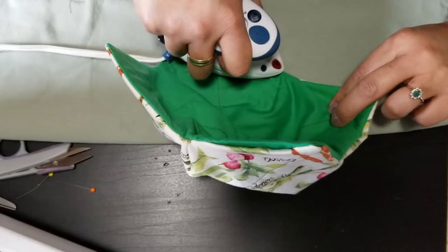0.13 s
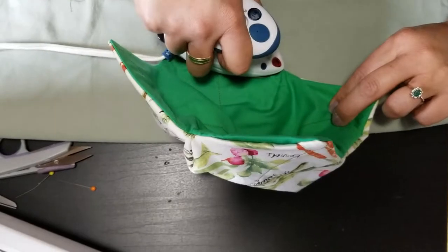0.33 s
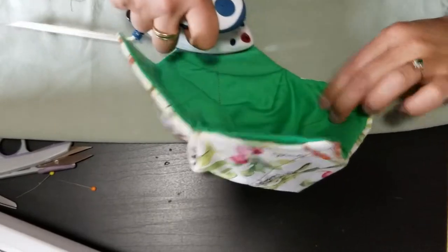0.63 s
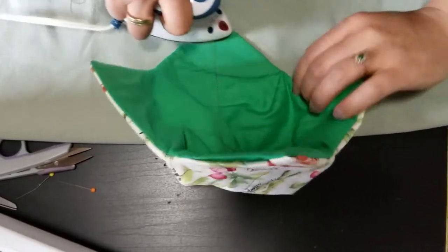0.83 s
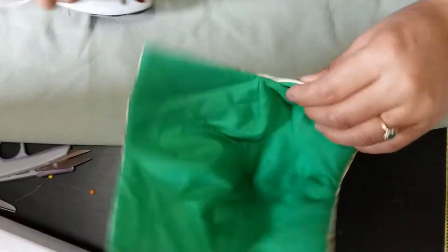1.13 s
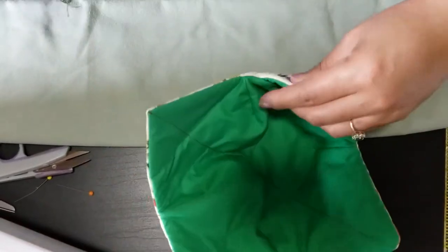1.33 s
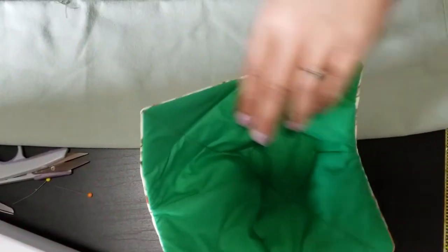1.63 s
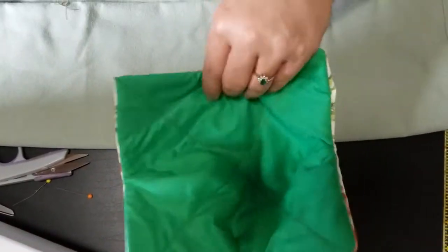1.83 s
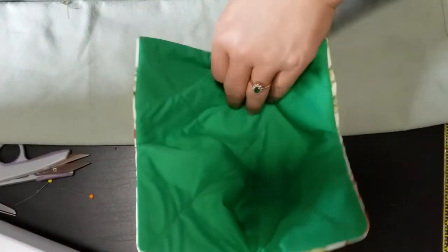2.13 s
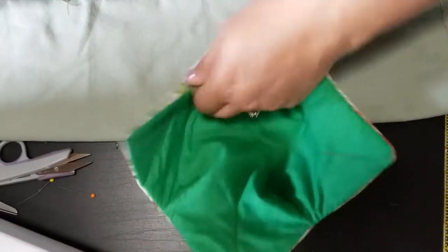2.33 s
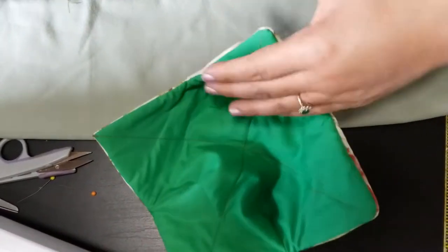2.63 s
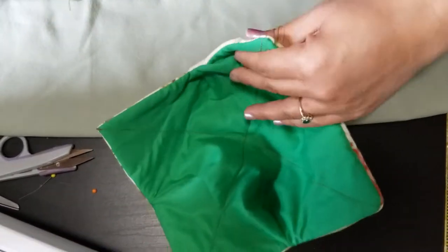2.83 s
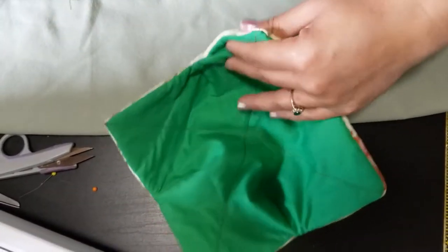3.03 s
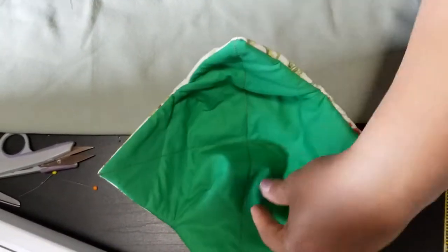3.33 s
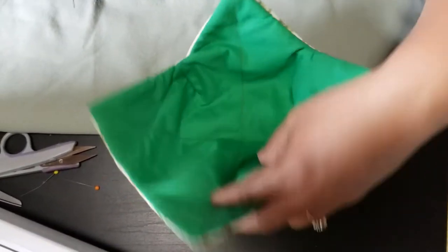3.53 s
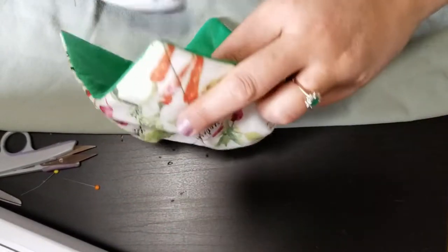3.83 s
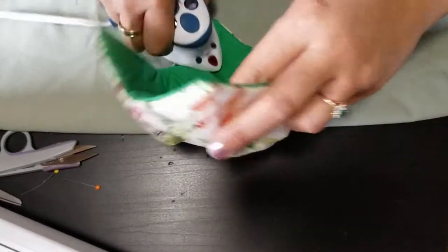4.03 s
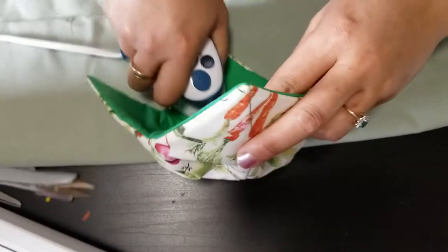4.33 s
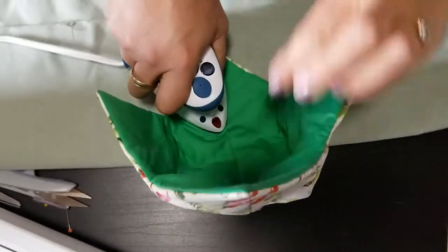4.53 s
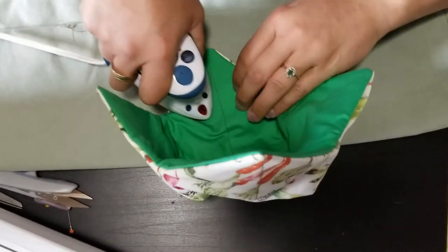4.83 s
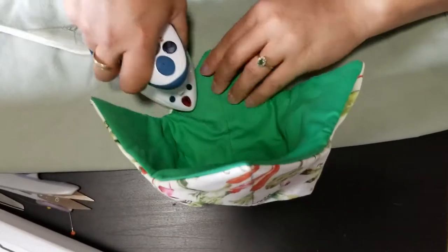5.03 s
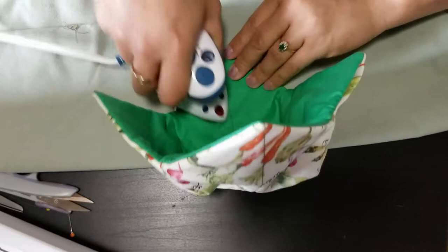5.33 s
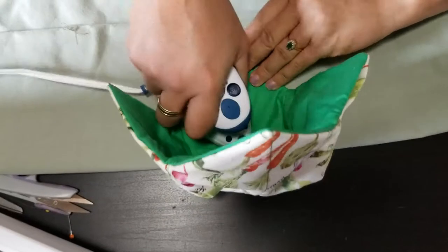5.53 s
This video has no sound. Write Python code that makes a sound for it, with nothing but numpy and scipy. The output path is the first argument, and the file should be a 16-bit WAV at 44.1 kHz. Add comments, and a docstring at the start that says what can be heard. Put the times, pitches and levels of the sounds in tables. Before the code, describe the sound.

Close to the microphone in a small, fairly dry room, low uneven rumble and soft bumps accompany faint cloth rustle. A small iron is stood aside with a clattering knock. A distant motor hums steadily, rising slightly and sinking, while hands turn the fabric. After it fades the iron lands with a deep padded thud, slides briefly, and ends with light taps.

```python
"""Room air, an uneven rumble and soft low bumps are heard first, then a clatter as a small iron is stood aside.
A quilted cloth bowl is turned by hand and pressed on a padded table, close to the microphone in a small room.
The cloth rustles as filtered noise under stroke envelopes; a distant motor hums as two gliding sines.
The iron lands with a thud (a sine of sagging pitch), slides (noise through resonances) and taps (struck modes)."""
import sys
import numpy as np
from scipy import signal
from scipy.fft import rfft, irfft, next_fast_len
from scipy.io import wavfile
from scipy.ndimage import map_coordinates

SR = 44100
rng = np.random.default_rng(int(sys.argv[2]) if len(sys.argv) > 2 else 0)


def waveform_to_disk(signal):
    """Save audio, clipped to [-1, 1], as 16-bit WAV at the path in sys.argv[1]."""
    frames = np.transpose(np.atleast_2d(signal))
    scaled = np.clip(frames, -1, 1) * 32767
    samples = np.round(scaled).astype(np.int16)
    wavfile.write(sys.argv[1], SR, samples)


N = 250929
TIME = np.arange(N) / SR  # s


def amp(db):
    """Level law: decibels to amplitude gain."""
    return 10 ** (np.asarray(db) / 20)


def unit(x):
    """Normalisation: scale to rms 1."""
    return x / np.sqrt(np.mean(x ** 2) + 1e-20)


def along(points, hz):
    """Logarithmic frequency scale: interpolate (frequency_hz, value) points."""
    point_hz, value = np.transpose(points)
    return np.interp(np.log(hz + 1), np.log(point_hz + 1), value)


def curves(rows):
    """Linear interpolation in time: one value per sample for each column after the time."""
    time_s, *columns = np.transpose(rows)
    return [np.interp(TIME, time_s, column) for column in columns]


def wobble(knots_per_s):
    """Slow random modulation: a smooth curve through random knots."""
    knots = rng.standard_normal(int(N * knots_per_s / SR) + 4)
    return map_coordinates(knots, [TIME * knots_per_s])


def filtered(x, response):
    """Linear filtering: multiply the spectrum by a response of frequency."""
    size = x.shape[-1]
    padded = next_fast_len(size + SR // 4)
    spectrum = rfft(x, padded) * response(np.fft.rfftfreq(padded, 1 / SR))
    return irfft(spectrum, padded)[..., :size]


def colour(points):
    """Spectral shaping: the response through a few (frequency_hz, level_db) points."""
    return lambda hz: amp(along(points, hz))


def body(modes):
    """Modal superposition: the causal response of resonances with alternating signs."""
    def response(f):
        total = 0
        for k, (centre, width, db) in enumerate(modes):
            resonance = 1j * f * width / (centre * centre - f * f + 1j * f * width)
            total = total + (-1) ** k * amp(db) * resonance
        return total
    return response


# Left-right likeness of diffuse sound: frequency_hz, correlation
LIKENESS = [(60, 1), (150, 0.84), (450, 0.9), (750, 0.62), (1200, 0.13), (2400, 0.1), (6000, 0.076),
            (15000, 0.034)]


def diffuse(response, size=N):
    """Diffuse field: coloured noise of rms 1, alike on both sides in the bass, nearly unrelated in the treble."""
    def mid_side(hz):
        angle = np.arccos(np.clip(along(LIKENESS, hz), -1, 1)) / 2
        return response(hz) * [np.cos(angle), np.sin(angle)]
    mid, side = filtered(rng.standard_normal((2, size)), mid_side)
    return unit(np.array([mid + side, mid - side]))


def add(track, s, sound):
    """Superposition: mix a sound into the track at s seconds."""
    part = track[:, round(s * SR):][:, :sound.shape[-1]]
    part += sound[..., :part.shape[-1]]


def swell(full_s, hold_s, rise_db_per_s, fall_db_per_s):
    """Exponential envelope: a movement rises to full gain at full_s, holds and dies away."""
    before_s = np.maximum(full_s - TIME, 0)
    after_s = np.maximum(TIME - full_s - hold_s, 0)
    return amp(-rise_db_per_s * before_s - fall_db_per_s * after_s)


def blow(hz, rise_cycles, sharpness, sag, ring_db, ring_t60):
    """Damped impact: a push swells for about a cycle; its pitch sags quickly from its onset, and it rings briefly."""
    t = np.arange(SR // 3) / SR
    u = t * hz / rise_cycles  # time in units of the rise
    push = (u * np.exp(1 - u)) ** sharpness
    ring = amp(ring_db - 60 * t / ring_t60) * (1 - np.exp(-u))
    turns = rise_cycles * (0.83 * u + sag * (1 - np.exp(-u)))
    return (push + ring) * np.sin(2 * np.pi * turns)


# Room air and rumble, both relative: time_s, air_db, rumble_db
BACKGROUND_LEVELS = [(0, -0.5, 5.5), (1.3, 2.5, -3), (1.9, 1, -3.5), (2.7, 0.5, 7.5), (3.3, 1, -11),
                     (4, 1.5, -6), (4.4, -4, -17), (5.69, -4.5, -14.5)]
# Spectrum of the room air: frequency_hz, level_db (relative, per Hz)
AIR_SPECTRUM = [(60, 4.5), (170, 2), (290, -5), (420, 2.5), (600, -7.5), (800, -11.5), (1100, -20),
                (1500, -20), (2100, -35), (3500, -43.5), (6000, -49), (9500, -54), (12000, -35),
                (15800, -36.5)]
# Spectrum of the rumble: frequency_hz, level_db (relative, per Hz)
RUMBLE_SPECTRUM = [(20, -21.5), (40, -4), (65, 8.5), (100, -0.5), (160, -4.5), (260, -50), (600, -80)]


def background(air_db=-46.5, rumble_db=-43, mains_db=-54, mains_hz=60, lumps_db=-1.0):
    """Ambient noise: room air, a faint mains hum and an uneven rumble partly separate on each side."""
    air_change, rumble_change = curves(BACKGROUND_LEVELS)
    lumps = amp(lumps_db * np.array([wobble(10), wobble(6)]))
    jolts = rng.standard_normal((2, N)) + 0.92 * rng.standard_normal(N)  # each side's own + shared
    rumble = unit(lumps * filtered(jolts, colour(RUMBLE_SPECTRUM)))
    mains = amp(mains_db) * np.sqrt(2) * np.sin(2 * np.pi * mains_hz * TIME)
    air = amp(air_db + air_change) * diffuse(colour(AIR_SPECTRUM))
    return air + amp(rumble_db + rumble_change) * rumble + mains


# Speed of the distant motor, heard as its hum: time_s, pitch_hz (before a slight waver)
MOTOR_PITCH = [(0.6, 126.4), (1.29, 127.7), (1.86, 131.2), (2.25, 131.3), (2.95, 129.4), (3.19, 127.3),
               (3.56, 124.5), (3.88, 123)]
MOTOR_ON_S, MOTOR_RUN_S, MOTOR_RISE_DB_PER_S, MOTOR_FALL_DB_PER_S = 0.62, 3.18, 98, 15
MOTOR_DB, MOTOR_FULL_HZ, MOTOR_DB_PER_HZ = -34, 131, 1.05  # level at full speed; loss for each Hz below it
MOTOR_COAST_HZ_PER_S = 5  # it keeps slowing as it fades


def motor(waver_db=0.34, waver_hz=0.31, shaft_db=-18):
    """Rotating source: a hum and a faint shaft tone an octave below pass the walls, louder at higher speed."""
    hz = curves(MOTOR_PITCH)[0] - MOTOR_COAST_HZ_PER_S * np.maximum(TIME - MOTOR_PITCH[-1][0], 0)
    level_db = MOTOR_DB - MOTOR_DB_PER_HZ * np.maximum(MOTOR_FULL_HZ - hz, 0)
    running = swell(MOTOR_ON_S, MOTOR_RUN_S, MOTOR_RISE_DB_PER_S, MOTOR_FALL_DB_PER_S)
    phase = 2 * np.pi * np.cumsum(hz + waver_hz * wobble(6.4)) / SR
    tones = np.sin(phase) + amp(shaft_db) * np.sin(phase / 2)
    return running * amp(level_db + waver_db * wobble(17)) * np.sqrt(2) * tones


# Soft handling bumps, each mostly on one side:
# swell_s (end of the rise), level_db (nominal, mean of the sides), pitch_hz (nominal), left_over_right_db
HANDLING_BUMPS = [(0.044, -31.5, 72.6, 15), (0.167, -22, 77, -14), (0.859, -33, 81, -19),
                  (1.243, -23, 84.5, -21), (1.577, -30, 89.4, -12), (2.104, -32, 70, -29),
                  (2.259, -30.5, 69, 29), (2.42, -24.5, 70.7, -22), (2.548, -28, 68, -11),
                  (2.684, -27, 70.6, -18), (2.756, -29.5, 90, 26), (4.716, -39, 71, -31),
                  (4.986, -33.5, 75, -36)]


def bumps(rise_cycles=0.88, edge_db=-11, edge_hz=185):
    """Near-field jolts: dull damped blows close to the microphone, each with a brief higher edge."""
    out = np.zeros((2, N))
    for s, db, hz, pan_db in HANDLING_BUMPS:
        sides = amp([[pan_db / 2], [-pan_db / 2]])
        for pitch, level in (hz, db), (edge_hz, db + edge_db):
            wave = blow(pitch, rise_cycles, sharpness=2.17, sag=0.48, ring_db=-7.5, ring_t60=0.24)
            add(out, s - rise_cycles / pitch, amp(level) * sides / sides.mean() * wave)
    return out


# Strokes of the hands over the cloth: full_s, hold_s, level_db (before the mix), brightness_db
HAND_STROKES = [(0.375, 0.69, -61.5, 0), (0.876, 0.062, -55, 0), (1.207, 0.4, -66.5, -5.5),
                (1.662, 0.38, -68, -0.5), (2.079, 0.0087, -60.5, 5), (2.152, 0.095, -64.5, 1.5),
                (2.313, 0.016, -62.5, 2), (2.547, 0.015, -69.5, -7.5), (2.735, 0.52, -73.5, 3.5),
                (2.88, 0.019, -68, 3.5), (3.042, 0.021, -62, 4), (3.336, 0.22, -67.5, 2.5),
                (3.608, 0.39, -75.5, -7), (4.031, 0.08, -61.5, -1), (4.727, 0.34, -64, 0),
                (5.108, 0.36, -73, 1.5), (5.381, 0.15, -60, -4.5)]
# Cloth dragging on the pad: frequency_hz, level_db (relative, per Hz)
DRAG_SPECTRUM = [(200, -9), (700, -7.5), (1050, 9.5), (1500, 3.5), (2500, 0), (4300, -7), (6500, -22),
                 (15800, -42)]
# Fibres brushing, here and under the sliding iron: frequency_hz, level_db (relative, per Hz)
BRUSH_SPECTRUM = [(1000, -13), (3000, -12), (4300, 2), (6500, -0.5), (8500, -0.5), (11000, 0.5),
                  (15800, -0.5)]
STROKE_RISE_DB_PER_S, STROKE_FALL_DB_PER_S = 253, 152
HELD_DB, HELD_BRIGHT_DB = -85.5, -2.5  # the cloth stirring while it is only held


def cloth(flutter_db=1, grain_db=0.5, pressure_db=1.4):
    """Stick-slip friction: cotton drags dully on the pad and brushes brightly on the fingers in tiny bursts."""
    drag, brush = amp(HELD_DB - HELD_BRIGHT_DB), amp(HELD_DB + HELD_BRIGHT_DB)
    for full_s, hold_s, db, bright_db in HAND_STROKES:
        stroke = swell(full_s, hold_s, STROKE_RISE_DB_PER_S, STROKE_FALL_DB_PER_S)
        # powers of overlapping strokes add
        drag = np.hypot(drag, amp(db - bright_db) * stroke)
        brush = np.hypot(brush, amp(db + bright_db) * stroke)
    grains = unit(amp(pressure_db * wobble(16) + flutter_db * wobble(53) + grain_db * wobble(700)))
    rub = drag * diffuse(colour(DRAG_SPECTRUM)) + brush * diffuse(colour(BRUSH_SPECTRUM))
    return grains * rub / np.sqrt(2) * amp([[.6], [-.6]])  # slightly to the left


# Resonances of the sliding iron: frequency_hz, width_hz, level_db (relative)
SOLE_MODES = [(282.5, 13.4, -8), (378.6, 16.4, -3.5), (419, 21, -4.5), (570, 41, -13), (720, 130, -19.5),
              (1615, 53, -21), (1992, 120, -23.5)]
# Fibres rubbing under the sole: frequency_hz, level_db (relative, per Hz)
RUB_SPECTRUM = [(100, -4.5), (300, -3), (600, -15), (1050, -5.5), (2000, -12.5), (2800, -13.5), (4500, -16),
                (6800, -23.5), (11000, -16), (15800, -24.5)]
SLIDE_S, SLIDE_HOLD_S = 4.283, 0.062  # when the push reaches full speed and how long it stays there
SLIDE_DB = -37  # at full speed, before the layer mix
SLIDE_RISE_DB_PER_S, SLIDE_FALL_DB_PER_S = 140, 200.5  # the push gathers speed and stops


def slide(sole_db=-1, rub_db=-8, hiss_db=-19, grain_db=2):
    """Friction-driven resonance: the pushed sole sings in the iron's modes while the fibres rub and hiss."""
    push = swell(SLIDE_S, SLIDE_HOLD_S, SLIDE_RISE_DB_PER_S, SLIDE_FALL_DB_PER_S)
    stroke = amp(SLIDE_DB + grain_db * wobble(250)) * push
    rub = amp(rub_db) * diffuse(colour(RUB_SPECTRUM))
    hiss = amp(hiss_db) * diffuse(colour(BRUSH_SPECTRUM))
    return stroke * (amp(sole_db) * diffuse(body(SOLE_MODES)) + rub + hiss)


# Reverberation of the small room: frequency_hz, t60_s
ROOM_DECAY = [(150, 0.43), (500, 0.11), (2000, 0.2), (5000, 0.22), (14000, 0.19)]


def room(x, wet_db):
    """Reverberation: add the walls' answer, a noise tail with its own decay time at each frequency."""
    hz, t, z = signal.stft(diffuse(np.ones_like, size=SR // 2), SR, nperseg=256)
    decay = amp(-60 * t / along(ROOM_DECAY, hz)[:, None])
    tail = signal.istft(z * decay, SR, nperseg=256)[1]
    tail = np.pad(tail / np.linalg.norm(tail[0]), ((0, 0), (SR // 200, 0)))  # 5 ms delay
    return x + amp(wet_db) * signal.fftconvolve(x.mean(0)[None], tail, axes=1)[:, :N]


def struck(modes, t, vary_db, scatter):
    """Modal excitation: one contact rings resonances at fresh strengths, with side phases set apart by scatter."""
    wave = 0
    for k, (hz, width, db) in enumerate(modes):
        offset = scatter * rng.uniform(-0.44, 0.37) * np.array([[1], [-1]])
        ring = np.sin(2 * np.pi * (hz * t + k / 2 + offset))
        strength = width * amp(db + rng.normal(0, vary_db))
        wave = wave + strength * np.exp(-np.pi * width * t) * ring
    wave = wave * (1 - np.exp(-t / 0.0002))  # soften the onset
    return wave / np.sqrt(np.mean(wave[:, :SR // 50] ** 2))  # rms 1 over the first 20 ms


# Hard contacts of the iron: start_s, strength_db, hardness_db, rattle_s (length of the rebounds after it)
HARD_CONTACTS = [(0.377, -54, 7.5, 0), (0.952, -42.5, 5.5, 0), (1.134, -38.5, -2, 0), (1.153, -37.5, -5, 0),
                 (1.16, -33.5, -21, 0), (1.176, -23.5, -9, 0.012), (1.254, -30, -16.5, 0.036),
                 (4.002, -39.5, -10, 0), (4.009, -26.5, -3, 0.02), (4.064, -55, 22.5, 0),
                 (5.173, -49, 7, 0), (5.372, -43.5, -23, 0.012), (5.475, -44.5, -11, 0),
                 (5.502, -34.5, -12, 0.012), (5.579, -48.5, -3.5, 0)]
REBOUND_S, REBOUND_DB, REBOUND_LOSS_DB = 0.008, -7, 1.6  # mean gap, level re the blow, further loss at each
REBOUND_SOFTER_DB = 5  # a rebound is less hard than its blow


def contacts():
    """Inelastic rebound: each knock and its softer, ever weaker rebounds, as (start_s, strength_db, hardness_db)."""
    for s, db, hard_db, rattle_s in HARD_CONTACTS:
        yield s, db, hard_db
        for k in range(1, int(rattle_s / REBOUND_S) + 1):
            rebound_s = s + REBOUND_S * (k + rng.uniform(-0.2, 0.2))
            yield rebound_s, db + REBOUND_DB - REBOUND_LOSS_DB * k, hard_db - REBOUND_SOFTER_DB


# Resonances of the iron's body: frequency_hz, width_hz, level_db (relative)
SHELL_MODES = [(960, 110, -2.5), (1294, 59, 0.5), (1513, 130, 7), (1666, 220, 1.5), (2075, 51, -13),
               (2590, 250, -16), (2780, 340, -6)]
# Resonances of the table: frequency_hz, width_hz, level_db (relative)
TABLE_MODES = [(192.6, 50, -3.5), (293, 51, -6.5), (428, 66, -1), (471, 76, -1.5), (604, 79, -5.5),
               (710, 116, -11)]
# Short rattle on each contact: frequency_hz, level_db (relative, per Hz)
CLACK_SPECTRUM = [(150, -6), (500, -27), (750, 1.5), (1100, 0), (1700, -3), (2700, -9.5), (3500, -20.5),
                  (4700, -26), (6500, -44), (15800, -33.5)]
# Bright tick of a hard contact: frequency_hz, level_db (relative, per Hz)
TICK_SPECTRUM = [(500, -9.5), (2500, 11.5), (4500, 7.5), (7000, 0), (11000, 0.5), (15800, -5.5)]
SOFT_TO_TABLE = 0.36  # dB more into the table for each dB less hardness


def knocks(clack_t60=0.075, tick_t60=0.014, clack_db=-7, shell_db=-15, table_db=-11, tick_db=-6):
    """Impact excitation: contacts ring shell and table under a short rattle; hard ones tick, soft ones thump."""
    out = np.zeros((2, N))
    t = np.arange(SR // 4) / SR

    def burst(spectrum, t60):
        return diffuse(colour(spectrum), size=len(t)) * amp(-60 * t / t60)

    for s, db, hard_db in contacts():
        add(out, s, amp(db + shell_db) * struck(SHELL_MODES, t, vary_db=6.5, scatter=0.59))
        add(out, s, amp(db + clack_db) * burst(CLACK_SPECTRUM, clack_t60))
        thump_db = db + table_db - SOFT_TO_TABLE * hard_db
        add(out, s, amp(thump_db) * struck(TABLE_MODES, t, vary_db=2.5, scatter=0.15))
        add(out, s, amp(db + tick_db + hard_db) * burst(TICK_SPECTRUM, tick_t60))
    return room(out, wet_db=1.0) * amp([[.5], [-.5]])  # slightly to the left


# The iron meets the padded table: swell_s (end of the rise), level_db (nominal), pitch_hz (nominal)
IRON_THUDS = [(0.961, -20, 121), (4.011, -4, 111.5)]


def thuds(rise_cycles=0.922, left_lead_s=0.000065):
    """Damped impact: the iron's weight drops on the padding and the table booms, reaching the left side first."""
    out = np.zeros((2, N))
    for s, db, hz in IRON_THUDS:
        boom = amp(db) * blow(hz, rise_cycles, sharpness=2.06, sag=0.6, ring_db=-13.5, ring_t60=0.3)
        start_s = s - rise_cycles / hz
        add(out[:1], start_s, boom)
        add(out[1:], start_s + left_lead_s, boom)
    return out


def scene():
    """Superposition: everything at the ironing table sounds together."""
    return background() + motor() + bumps() + cloth() + slide() + knocks() + thuds()


def record(dry):
    """Band limiting: nothing at or above 15850 Hz is kept."""
    return filtered(dry, lambda hz: hz < 15850)


dry = scene()
out = record(dry)
waveform_to_disk(out)
```